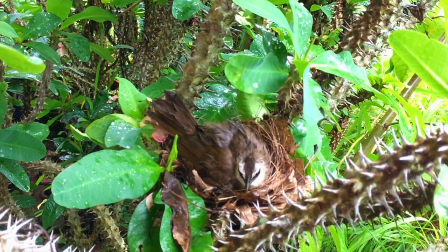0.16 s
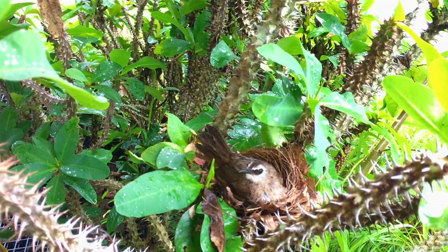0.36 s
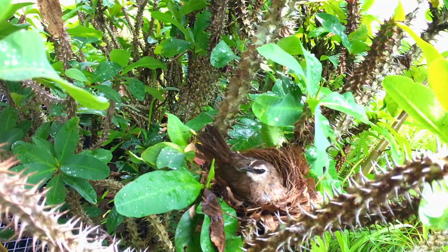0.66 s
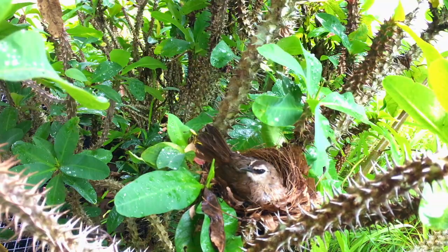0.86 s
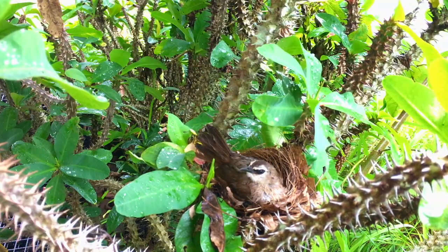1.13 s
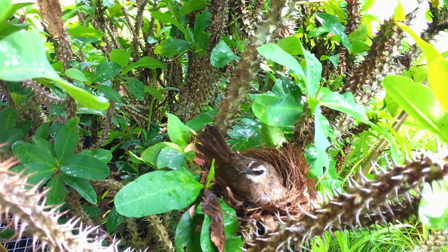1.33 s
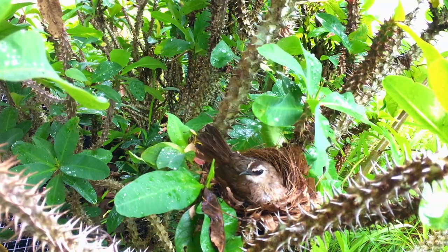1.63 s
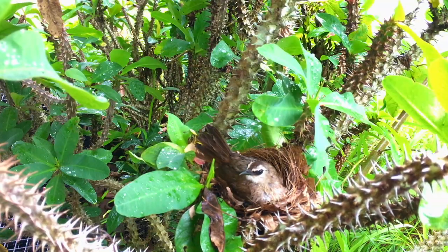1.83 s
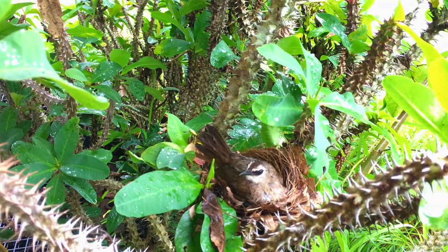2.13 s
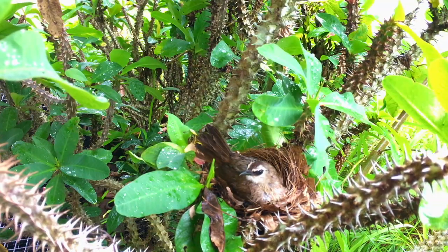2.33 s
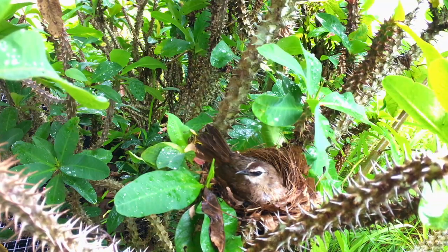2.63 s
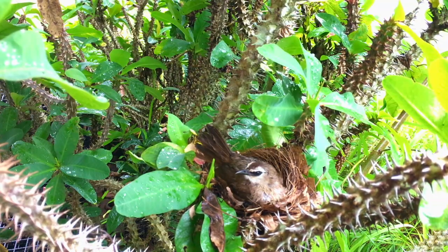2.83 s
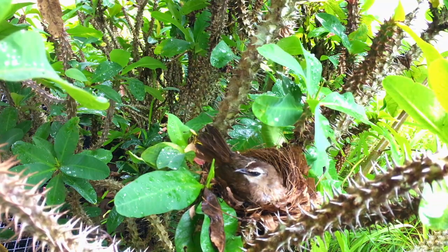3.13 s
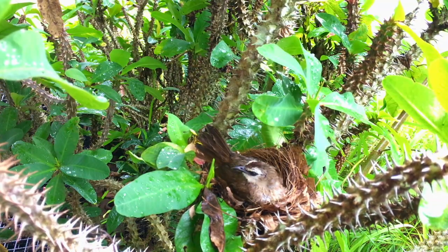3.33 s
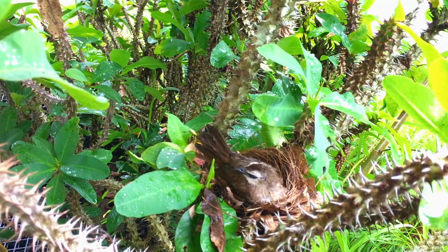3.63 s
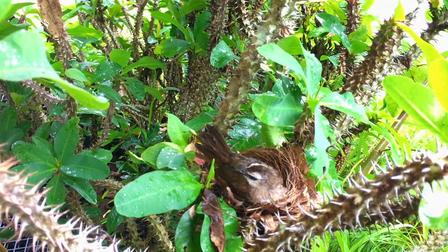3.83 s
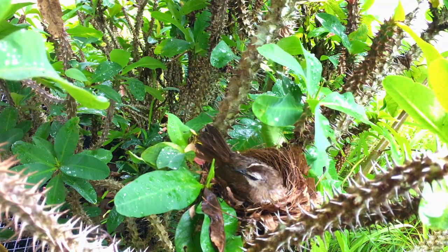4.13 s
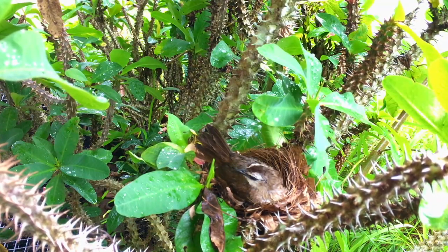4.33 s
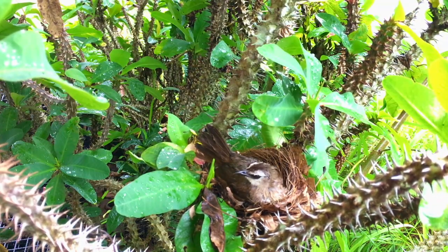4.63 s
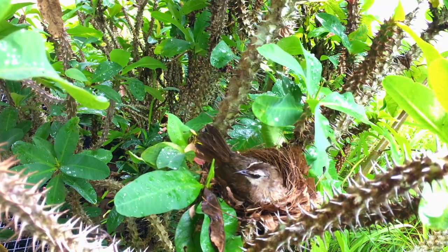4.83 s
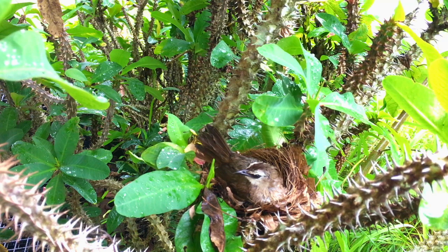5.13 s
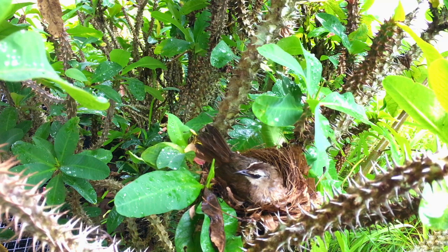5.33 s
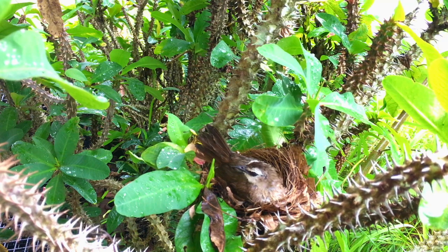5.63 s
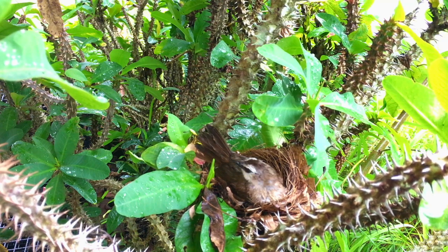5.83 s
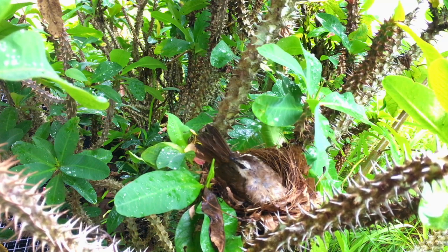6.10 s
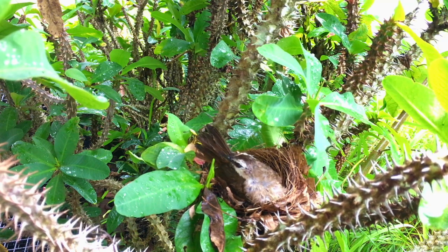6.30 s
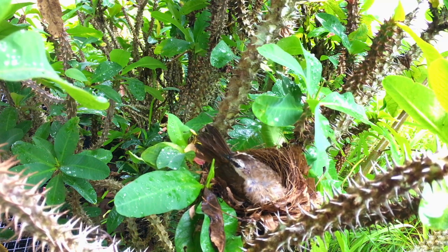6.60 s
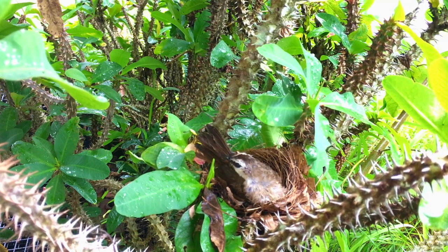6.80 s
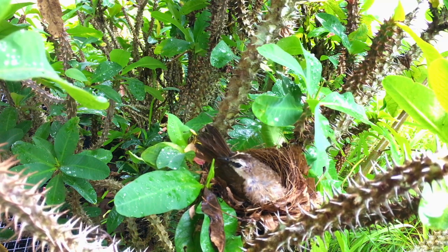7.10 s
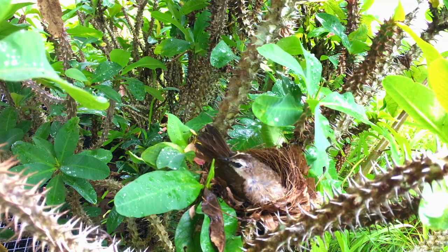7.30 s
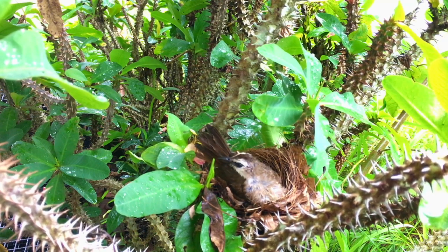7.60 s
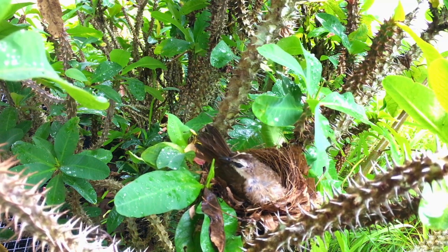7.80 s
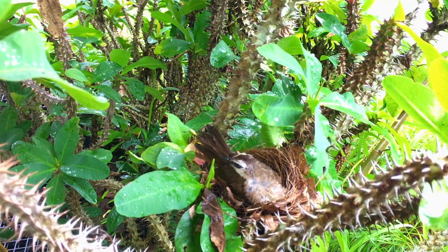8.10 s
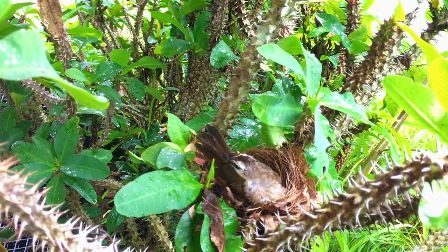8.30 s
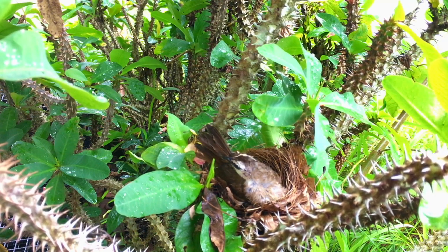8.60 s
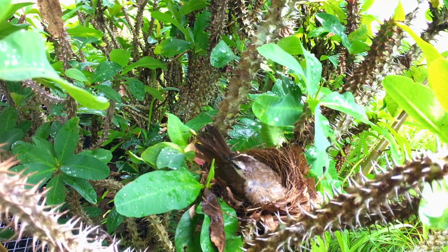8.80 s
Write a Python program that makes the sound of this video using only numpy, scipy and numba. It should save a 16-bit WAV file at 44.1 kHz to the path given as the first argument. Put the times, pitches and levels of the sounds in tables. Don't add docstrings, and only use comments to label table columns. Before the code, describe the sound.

Outdoors in dense foliage around a nest, steady rain makes a bright, grainy hiss throughout. Close to a small microphone, irregular drops snap, tick and tap on leaves, some with a short spray of droplets, others landing as duller plops. A faint, thin bird whistle comes briefly every second or two, blurred by leaves. A very low distant road rumble lies beneath. The nesting bird itself makes no distinct sound.

```python
import sys
import numpy as np
from scipy import signal
from scipy.fft import rfft, irfft, next_fast_len
from scipy.io import wavfile
from scipy.ndimage import uniform_filter1d
from numba import njit

SR = 44100
rng = np.random.default_rng(int(sys.argv[2]) if len(sys.argv) > 2 else 0)


def generate_wav(signal):
    frames = np.transpose(np.atleast_2d(signal))
    scaled = np.clip(frames, -1, 1) * 32767
    pcm = np.round(scaled).astype(np.int16)
    wavfile.write(sys.argv[1], SR, pcm)


def gain_from_db(level_db):
    decades = np.asarray(level_db, float) / 20
    return 10 ** decades


N = 394694


def level(x, db):
    return x * gain_from_db(db) / np.sqrt(np.mean(x ** 2))


def curve(table):
    return np.interp(np.arange(N) / SR, *np.transpose(table))


def walk(rate):
    hold = int(SR / rate)
    steps = np.repeat(rng.standard_normal(N // hold + 1), hold)
    smooth = uniform_filter1d(uniform_filter1d(steps, hold), hold)
    return 1.3 * smooth[:N]


@njit
def strike(rows, noise, lumps):
    out = np.zeros(len(noise))
    for start_s, peak, hz, width_hz, blow, crack_s, spatter, tail_s in rows:
        start = int(start_s * SR)
        size = max(min(int(4 * tail_s * SR), len(out) - start), 0)
        g, damping = np.tan(np.pi * hz / SR), width_hz / hz
        crack_decay, tail_decay = np.exp(-1 / (crack_s * SR)), np.exp(-1 / (tail_s * SR))
        y = np.empty(size)
        band1, low1, band2, low2 = 0., 0., 0., 0.
        crack_env, tail_env, loudest = 1., spatter, 1e-9
        for i in range(size):
            x = noise[start + i] * (crack_env + tail_env * lumps[start + i])
            if i == 0:
                x += blow
            v = (band1 + g * (x - low1)) / (1 + g * (g + damping))
            band1, low1 = 2 * v - band1, low1 + 2 * g * v
            w = (band2 + g * (damping * v - low2)) / (1 + g * (g + damping))
            band2, low2 = 2 * w - band2, low2 + 2 * g * w
            y[i] = w
            loudest = max(loudest, abs(w))
            crack_env *= crack_decay
            tail_env *= tail_decay
        out[start:start + size] += y * peak / loudest
    return out


def drops(start_s, peak_db, hz, spatter_db, broad, blow, crack_s, tail_s):
    vary = np.exp(.15 * rng.standard_normal((len(start_s), 3))).T
    hz = np.clip(hz, 200, .4 * SR)
    rows = np.broadcast_arrays(start_s + .0006, gain_from_db(peak_db), hz, broad * hz * vary[0], blow,
                               crack_s * vary[1], gain_from_db(spatter_db), tail_s * vary[2])
    lumps = gain_from_db(3. * walk(400))
    return strike(np.ascontiguousarray(np.transpose(rows), float), rng.standard_normal(N), lumps)


def alike(table, *shared):
    return [(*row, *shared) for row in table]


def patter(count, db, spread_db, low_hz, high_hz, broad, crack_s, spatter_db):
    when, size, pitch = rng.random((count, 3)).T
    start_s = when * (N - 1) / SR
    peak_db = db - spread_db * np.log(.14 + size)
    hz = low_hz * (high_hz / low_hz) ** pitch
    return drops(start_s, peak_db, hz, spatter_db, broad, blow=7.9, crack_s=crack_s, tail_s=0.009)


def bands(shape, flicker_db, rate):
    size = next_fast_len(N)
    hz = np.arange(1, size // 2 + 2) * SR / size
    spots, db = np.transpose(shape)
    spectrum_db = np.interp(np.log(hz), np.log(spots), db, -120, -120)
    noise = rfft(rng.standard_normal(size)) * gain_from_db(spectrum_db)
    place = 2 * np.log2(hz / spots[0])
    out = np.zeros(N)
    for k in range(int(2 * np.log2(spots[-1] / spots[0])) + 2):
        part = irfft(noise * np.clip(1 - abs(place - k), 0, 1), size)[:N]
        out += part * gain_from_db(flicker_db * walk(rate))
    return out


def far_rain():
    # start_s, level_db
    shower = [(0.0, -34.5), (0.6, -35.5), (1.0, -35.5), (2.64, -35.5), (3.01, -34), (3.16, -34.5),
              (4.21, -36.5), (4.56, -35.5), (4.79, -36), (5.43, -34), (5.76, -36), (6.68, -36),
              (6.98, -34.5), (8.13, -35), (8.5, -37.5), (8.95, -34.5)]
    # frequency_hz, density_db (per Hz)
    hiss_spectrum = [(240, -17), (400, -14), (511, -17), (1000, -0.5), (1420, -1.5), (3250, 0.5),
                     (4840, -1.5), (6480, -2), (9500, 0.5), (10400, 2), (12500, 1.5), (16000, -4.5)]
    hiss = level(bands(hiss_spectrum, flicker_db=1.4, rate=30), -6.5)
    needles = patter(count=2500, db=2, spread_db=3., low_hz=4500, high_hz=14000,
                     broad=1.3, crack_s=.0008, spatter_db=-22)
    fine = patter(count=1100, db=2.5, spread_db=3.3, low_hz=5200, high_hz=16100,
                  broad=0.92, crack_s=0.0045, spatter_db=-8)
    middle = patter(count=1100, db=-4.5, spread_db=2.5, low_hz=1805, high_hz=5500,
                    broad=0.72, crack_s=0.0021, spatter_db=-14.5)
    dull = patter(count=900, db=-18.5, spread_db=4.0, low_hz=650, high_hz=1700,
                  broad=0.51, crack_s=0.0032, spatter_db=-15.0)
    gusts = gain_from_db(1.2 * walk(45))
    return gain_from_db(curve(shower)) * gusts * (hiss + needles + fine + middle + dull)


def road():
    # start_s, level_db
    rumble = [(0.0, -54), (3.66, -54), (7.03, -53), (8.95, -53.5)]
    # frequency_hz, density_db (per Hz)
    traffic = [(18, -37), (30, -26), (46, -1), (64, 1.5), (108, -2.5), (140, -8.5), (257, -12.5),
               (297, -13), (459, -18.5), (630, -15), (700, -14.5), (910, -29), (1540, -120)]
    return level(bands(traffic, flicker_db=1.6, rate=3.08), 0) * gain_from_db(curve(rumble))


def ticks():
    # (cracks below and above 9 kHz, against the splash)
    hard = [(0.112, -4.5, -20, -3.5), (0.3365, -21, -6.5, -6.5), (0.4025, -5.5, -17, -18),
            (0.6269, -17, -7.5, -6), (0.8959, -21, -8, -23), (1.14, -14, -15, -8), (1.309, -23, -11, -1),
            (1.3828, -21.5, -13, -1.5), (1.6995, -13.5, -20, -7), (1.7895, -16.5, -6.5, -12),
            (1.824, -12, -15, -12), (2.053, -29, -24, -5), (2.3177, -10, -16, -13),
            (2.3456, -19.5, -17, -1), (2.5736, -5, -18, -19), (3.5292, -7, -19, -15),
            (4.43, -17.5, -24, -7), (4.6743, -12, -19, -15), (5.455, -10, -12, -6.5),
            (5.867, -18, -17, -5.5), (6.591, -19.5, -15, -2.5), (6.7812, -7.5, -15, -15),
            (6.8114, -13.5, -27, -4), (6.8836, -10.5, -14, -13), (6.997, -5.5, -15, -11),
            (7.0793, -15.5, -18, -5), (7.7563, -14.5, -8.5, -10), (8.139, -6.5, -9.5, -11.5),
            (8.2653, -15, -15, -7), (8.3858, -14, -7.5, -15)]
    # start_s, splash_db
    splashes = [(0.7128, -7), (1.2211, -6), (1.6227, -14), (1.6427, -8), (1.9485, -8.5), (2.4563, -7.5),
                (2.5152, -10), (2.5476, -11), (2.7935, -13), (2.9547, -6), (3.1183, -9), (3.9759, -10),
                (4.352, -9.5), (5.0549, -6.5), (5.2205, -8.5), (5.2934, -18), (5.4904, -10), (5.5982, -8),
                (5.8192, -16), (6.0586, -11.5), (6.1449, -7), (6.2776, -14), (7.2998, -10), (7.4041, -7),
                (7.5507, -9.5), (7.6989, -11), (8.3554, -13), (8.4078, -11), (8.8588, -8)]
    # low_crack_db, high_crack_db
    splash_crack = (-20.5, -17.5)
    # start_s, splash_db
    pricks = [(0.0333, -21), (0.844, -25), (0.9328, -16), (1.1234, -26), (1.4546, -23.5), (2.0762, -22),
              (2.2064, -24), (2.7377, -25), (2.8549, -17), (2.8749, -23), (3.2006, -15), (3.4022, -13),
              (3.7174, -17), (3.8227, -21), (4.1076, -15), (4.1989, -20.5), (4.4932, -20), (4.8813, -17),
              (5.1976, -17), (5.4231, -20), (6.3505, -18.5), (6.5091, -21), (6.7476, -21), (7.0474, -16.5),
              (7.217, -15), (7.9209, -11), (8.0501, -12), (8.6068, -19), (8.6253, -13), (8.7485, -19)]
    # low_crack_db, high_crack_db
    prick_crack = (-22, -9.5)
    rows = hard + alike(splashes, *splash_crack) + alike(pricks, *prick_crack)
    start_s, splash_db, low_db, high_db = np.transpose(rows)
    splash_db = splash_db - 0.16 * (splash_db + 25.5)
    spatter_db = -16.5 + (low_db + high_db) / -3 - 0.057 * (splash_db + 8)
    low = drops(start_s, splash_db + low_db + 7.5, 6060.0, spatter_db,
                broad=0.9, blow=8, crack_s=0.004, tail_s=.024)
    high = drops(start_s, splash_db + high_db + 8.5, 11800.0, spatter_db,
                 broad=1.5, blow=7, crack_s=0.0045, tail_s=.024)
    return low + high


def sprays():
    # start_s, peak_db, centre_hz
    bursts = [(0.0629, -40, 7360), (0.2714, -26, 6560), (0.3342, -29, 6600), (0.8421, -22, 12740),
              (0.894, -23, 12250), (0.9798, -26, 14710), (1.0202, -18, 7950), (1.2841, -25, 9440),
              (1.8468, -28, 6710), (1.9466, -20, 12330), (2.0513, -17.5, 12550), (2.0743, -24, 13940),
              (2.1551, -22, 12750), (2.3936, -24, 12480), (2.4744, -17, 14510), (2.5722, -27, 6200),
              (2.736, -23, 12270), (2.8735, -19, 12730), (2.9822, -28, 12670), (3.088, -25, 12300),
              (3.2995, -22, 14000), (3.4541, -24, 12300), (3.8333, -21, 13870), (3.944, -27, 7320),
              (4.1975, -31, 13080), (4.3142, -25, 12230), (4.5966, -24, 14790), (4.628, -29, 6710),
              (4.6734, -24.6, 13100), (5.0016, -26, 8280), (5.0775, -24, 13000), (5.1293, -31, 6280),
              (5.2481, -28, 12520), (5.297, -19, 12350), (5.3429, -22, 13390), (5.6412, -22, 6200),
              (5.8327, -28, 6470), (5.8916, -34, 5870), (6.161, -23, 14160), (6.1989, -23, 12810),
              (6.276, -27, 12500), (6.5082, -25, 9290), (6.6868, -23, 11900), (6.7467, -31, 12420),
              (6.8824, -22, 12460), (7.0121, -33, 12660), (7.0779, -28, 8730), (7.3413, -21.5, 6200),
              (7.4574, -24.5, 6130), (7.8152, -23, 12330), (7.8721, -28.4, 13190), (7.9529, -20, 11800),
              (8.0258, -36, 9120), (8.0627, -35, 8460), (8.1704, -21, 13980), (8.361, -16, 14830),
              (8.4288, -21, 14700), (8.6244, -20, 14560), (8.6623, -24.5, 7520), (8.801, -24, 6960)]
    start_s, peak_db, hz = np.transpose(bursts)
    return drops(start_s + .002, peak_db, hz, spatter_db=-10, broad=.9, blow=5, crack_s=.005, tail_s=.012)


def taps():
    # start_s, peak_db, ring_hz
    many = [(0.089, -25, 2800), (0.3367, -12.5, 2380), (1.1236, -19, 3840), (1.4554, -17.5, 3700),
            (1.8252, -37, 1610), (2.9844, -16.5, 2500), (3.05, -35, 1740), (3.7892, -16.5, 3820),
            (4.0023, -28, 2770), (4.108, -20, 3680), (4.649, -22, 3800), (6.1667, -16, 2280),
            (6.884, -19, 3720), (6.8846, -21.5, 2460), (6.997, -24, 2900), (7.0793, -24.5, 2860),
            (7.3502, -18, 3620), (7.401, -27.5, 1920), (7.7158, -18, 2300), (7.756, -25, 2450),
            (7.9259, -24, 2670), (8.1395, -6.5, 2870), (8.1635, -24, 2900), (8.176, -27, 2700),
            (8.2133, -30, 2560), (8.763, -21.5, 4200), (8.9113, -23, 2320)]
    # start_s, peak_db
    broad_leaf = [(0.226, -29), (0.4034, -21), (0.5217, -30), (0.7203, -19.5), (0.896, -19), (1.8966, -28),
                  (2.0537, -19.5), (3.0667, -19), (3.2081, -22), (3.375, -22.5), (3.7179, -24),
                  (4.1989, -27), (4.2646, -30.5), (4.4443, -28), (4.6756, -25), (4.696, -22),
                  (4.714, -25.5), (4.8803, -23.5), (5.455, -21), (5.6625, -22), (6.2778, -25),
                  (7.3093, -33), (7.415, -23), (7.4677, -25), (7.9034, -29), (8.0401, -28), (8.093, -22.5),
                  (8.2284, -22), (8.3754, -22)]
    # start_s, peak_db
    narrow_leaf = [(0.594, -19.5), (1.2224, -23), (1.3804, -20.5), (1.6464, -19), (1.6903, -21),
                   (1.7888, -33), (1.9475, -19), (2.5734, -19), (2.8544, -24), (3.823, -19), (4.4248, -28),
                   (4.5984, -34), (5.0549, -30), (5.3782, -29), (5.628, -20), (6.78, -39), (7.552, -17.5),
                   (7.6166, -23), (7.6989, -25), (8.569, -14.5), (8.6056, -20)]
    rows = many + alike(broad_leaf, 3270) + alike(narrow_leaf, 4460)
    start_s, peak_db, hz = np.transpose(rows)
    ring = drops(start_s, peak_db - 2.5, hz, spatter_db=-15 - 0.05 * (peak_db + 24),
                 broad=0.4, blow=13, crack_s=0.0034, tail_s=70 / hz)
    spray = drops(start_s, peak_db - 7.5, 1.8 * hz, spatter_db=-10,
                  broad=1.6, blow=9, crack_s=0.003, tail_s=0.016)
    return ring + spray


def light_taps():
    # start_s, peak_db, ring_hz
    light = [(0.1317, -28, 4570), (0.2245, -36, 3080), (0.5507, -31, 3640), (0.8241, -33, 2560),
             (0.8431, -34, 2100), (1.0027, -32, 3470), (1.0746, -34, 3290), (1.1584, -32, 3560),
             (1.2422, -29, 4300), (1.414, -31, 1990), (1.6981, -31, 4070), (1.7191, -31.5, 2630),
             (1.8229, -26, 3710), (1.8465, -31, 3060), (1.947, -32, 4560), (2.0184, -32, 3370),
             (2.1561, -30, 4320), (2.4544, -41, 4410), (2.4887, -34.1, 2090), (2.6913, -32, 2570),
             (2.7587, -35, 2690), (2.7727, -33, 3210), (2.9084, -34, 2980), (3.0251, -32, 3040),
             (3.1079, -30, 3040), (3.1628, -32, 2090), (3.4532, -36, 2690), (3.6018, -32, 4580),
             (3.8483, -31.5, 3540), (4.2635, -30, 3400), (4.4429, -31, 3540), (4.5966, -34, 4170),
             (4.6265, -31, 2370), (4.8155, -31, 3470), (4.8939, -24.5, 4700), (5.1315, -36, 2430),
             (5.2151, -34, 2930), (5.4885, -30, 3260), (5.6791, -31.5, 2420), (6.0044, -33, 2980),
             (6.0792, -32, 4300), (6.165, -27, 2240), (6.3605, -30, 3140), (6.445, -30.5, 3660),
             (6.5481, -31, 4350), (6.7457, -31, 4090), (6.9951, -31, 2750), (7.0101, -31.6, 2390),
             (7.0779, -34, 3080), (7.3074, -37, 3230), (7.4414, -31.5, 2520), (7.465, -35, 3330),
             (7.8731, -38, 2220), (7.9918, -32.2, 2700), (8.1615, -26, 3550), (8.2273, -28, 3280),
             (8.2632, -37, 3530), (8.4288, -33.2, 3080), (8.7744, -35, 2940), (8.799, -33, 3080)]
    start_s, peak_db, hz = np.transpose(light)
    return drops(start_s + .002, peak_db, hz, spatter_db=-12, broad=.4, blow=6, crack_s=.0035, tail_s=.014)


def mists():
    # start_s, peak_db, centre_hz, fade_s
    showers = [(4.4, -25, 16000, 0.027), (3.2, -20, 13800, 0.07), (6.82, -29, 13000, .05),
               (7.3, -19, 3300, 0.045), (5.9, -28, 10300, 0.083), (8.9, -31.5, 1700, .06),
               (4.716, -30, 2600, 0.023), (4.64, -32, 3600, 0.059), (0.345, -31, 2200, 0.036),
               (1.4255, -27, 5700, 0.0058), (7.2, -19, 5000, 0.011)]
    start_s, peak_db, hz, fade_s = np.transpose(showers)
    return drops(start_s, peak_db, hz, spatter_db=33, broad=0.87, blow=0, crack_s=0.00066, tail_s=fade_s)


def plops():
    # start_s, peak_db, ring_hz
    large = [(0.366, -26, 905), (0.601, -35, 920), (1.244, -27.5, 890), (1.416, -31, 950),
             (1.569, -29, 1570), (1.792, -28.5, 754), (1.839, -24, 1590), (1.869, -43, 1570),
             (3.254, -32.5, 1080), (3.477, -37, 1000), (3.957, -33.5, 940), (4.25, -29.5, 870),
             (4.385, -34, 990), (4.425, -32.5, 872), (4.664, -36, 867), (4.816, -34.5, 960),
             (5.118, -37.5, 860), (5.353, -34.5, 1010), (5.48, -25.5, 735), (5.54, -31, 1040),
             (5.652, -33, 940), (5.836, -33.5, 1030), (6.463, -42, 923), (6.612, -36.5, 674),
             (7.048, -35.5, 680), (7.801, -33.5, 1000), (7.822, -35, 890), (8.141, -19.5, 1730),
             (8.297, -35, 1030), (8.641, -33.5, 870)]
    start_s, peak_db, hz = np.transpose(large)
    return drops(start_s, peak_db - 2.5, hz, spatter_db=-17 - 0.28 * (peak_db + 29),
                 broad=0.48, blow=13.6, crack_s=0.0036, tail_s=0.03)


def small_leaves():
    # start_s, peak_db, ring_hz
    small = [(0.3775, -21, 9700), (0.5067, -27, 14000), (0.6534, -15, 15000), (0.7003, -31, 12400),
             (0.8584, -19.5, 6060), (0.8759, -15, 15400), (0.982, -26, 12100), (1.5618, -20, 9880),
             (1.7649, -17, 11300), (1.8486, -19, 5800), (1.9355, -24, 12700), (2.373, -19, 6900),
             (2.812, -22, 9300), (3.026, -27, 12600), (3.046, -19.5, 6000), (3.1453, -20, 11500),
             (3.6855, -22, 13700), (4.06, -21.5, 5640), (4.587, -25, 9470), (4.746, -20, 9600),
             (4.9302, -20, 12800), (5.4446, -19, 6710), (5.8346, -24, 6290), (5.892, -19, 5980),
             (5.99, -25, 9300), (3.739, -25, 5400), (6.991, -20, 6200), (5.783, -24, 11500),
             (5.538, -26, 12500), (6.412, -19, 7850), (6.7814, -11, 12700), (6.8115, -11, 12900),
             (7.175, -19, 8300), (7.3084, -17, 15000), (7.6755, -26, 8850), (8.314, -21, 6290)]
    start_s, peak_db, hz = np.transpose(small)
    return drops(start_s, peak_db - 3.5, hz, spatter_db=-8, broad=0.5, blow=7, crack_s=0.0035, tail_s=0.015)


def drips():
    # start_s, peak_db, ring_hz
    faint = [(0.456, -43, 1060), (0.8401, -43, 1040), (1.163, -39, 1440), (1.191, -35.5, 1730),
             (1.5368, -34, 1640), (1.5844, -35, 1630), (1.6632, -40.8, 1040), (1.8328, -34, 1640),
             (1.8598, -40, 1570), (1.9206, -41, 1260), (2.0124, -40, 950), (2.3886, -38.5, 1430),
             (2.4395, -32.5, 1660), (2.7098, -39, 1160), (2.9014, -40, 1040), (2.9553, -42.5, 674),
             (3.0461, -42, 1300), (3.1029, -46, 1670), (3.163, -36, 1390), (3.4003, -35, 1510),
             (3.537, -42, 636), (3.8632, -42, 980), (4.1667, -36.5, 1230), (4.389, -39, 1020),
             (4.9847, -42, 720), (5.0625, -39, 1550), (5.222, -44, 880), (5.7449, -41, 685),
             (5.7734, -56, 312), (5.8258, -44, 1070), (5.9555, -43, 1005), (6.1939, -41, 1320),
             (6.467, -38.5, 895), (6.4902, -41, 935), (6.5312, -41.5, 1130), (6.7387, -45, 1600),
             (7.3224, -37, 1550), (7.463, -38, 1020), (7.5927, -37, 1530), (7.6626, -42, 1010),
             (8.0876, -33, 1680), (8.283, -43, 1180), (8.5166, -34, 1650), (8.5655, -39, 920),
             (8.8533, -36, 1030)]
    start_s, peak_db, hz = np.transpose(faint)
    return drops(start_s + .005, peak_db, hz, spatter_db=-13, broad=.4, blow=9, crack_s=.004, tail_s=.02)


def bird():
    # start_s, level_db, held_hz, length_s
    whistles = [(.94, -42.5, 6300, .09), (2.65, -42, 6300, .12), (4.492, -39.5, 6220, .11),
                (5.797, -41, 6280, .09), (7.53, -41, 6280, .11)]
    out = np.zeros(N)
    waver = 1 + .013 * walk(200)
    for start_s, level_db, held_hz, length_s in whistles:
        start = int(start_s * SR)
        t = np.arange(int(2 * length_s * SR)) / SR
        slide = np.minimum(t / .024, 1)
        pitch_hz = held_hz * (.87 + .13 * slide) * waver[start:][:len(t)]
        attack = (.45 + .55 * slide ** 4) * np.minimum(t / .005, 1)
        swell = attack * np.exp(-1.2 * (t / length_s) ** 2)
        out[start:][:len(t)] = gain_from_db(level_db) * swell * np.sin(2 * np.pi * np.cumsum(pitch_hz) / SR)
    echoes = sum(np.roll(out, int(late_s * SR)) * gain_from_db(4 * walk(130)) for late_s in (0, .007, .019))
    return echoes * gain_from_db(-4.5)


def thuds():
    # start_s, peak_db, thud_hz
    stems = [(1.415, -51, 320), (2.717, -46, 204), (3.696, -49, 293), (4.395, -51, 207), (4.823, -46, 310),
             (5.225, -55, 296), (5.351, -50, 288), (5.778, -48, 280), (6.361, -47, 196),
             (6.736, -46.5, 196)]
    start_s, peak_db, hz = np.transpose(stems)
    return drops(start_s, peak_db, hz, spatter_db=-17, broad=0.77, blow=13.0, crack_s=0.015, tail_s=0.027)


def bubble():
    # start_s, peak_db, first_hz, length_s
    trapped_air = (4.001, -33, 1950, .014)
    start_s, peak_db, first_hz, length_s = trapped_air
    t = np.linspace(0, 1, int(length_s * SR))
    swell = np.sin(np.pi * np.sqrt(t))
    out = np.zeros(N)
    ring = np.sin(2 * np.pi * np.cumsum(first_hz * 2 ** t) / SR)
    out[int(start_s * SR):][:len(t)] = gain_from_db(peak_db) * swell * ring
    return out


def shed():
    # start_s, peak_db, low_ring_hz, high_ring_hz
    branch = [(8.814, -37, 980, 2240), (8.847, -31, 1240, 2380), (8.86, -26.5, 1050, 2600),
              (8.871, -43, 1020, 2670), (8.9, -26.5, 1510, 2170), (8.914, -40, 1110, 2190),
              (8.925, -26, 1210, 2180), (8.937, -37, 1164, 2400)]
    start_s, peak_db, low_hz, high_hz = np.transpose(branch)
    return sum(drops(start_s, peak_db - 8, hz, spatter_db=-5, broad=0.22, blow=2.5,
                     crack_s=0.0047, tail_s=0.024) for hz in (low_hz, high_hz))


def scene():
    background = far_rain() + road() + bird()
    near = ticks() + taps() + plops() + small_leaves() + shed() + bubble()
    light = sprays() + light_taps() + drips() + thuds() + mists()
    return (background + near + light)[None]


def low_pass(x):
    return signal.sosfilt(signal.butter(12, 17010, fs=SR, output="sos"), x)


def record(dry):
    # centre_hz, width_hz, depth_db
    case_dips = [(505, 48, -1.5), (4840, 790, -3.5), (10420, 650, -5)]
    hz = np.arange(1, N // 2 + 2) * SR / N
    shade_db = sum(db / (1 + (2 * (hz - centre) / width) ** 2) for centre, width, db in case_dips)
    shade_db = shade_db - 10 * np.log10(1 + (30 / hz) ** 6)
    shade_db = shade_db - 52 * np.clip((hz - 15740) / 120, 0, 1)
    return low_pass(irfft(rfft(dry) * gain_from_db(shade_db), N))


dry = scene()
out = record(dry)
generate_wav(out)
```